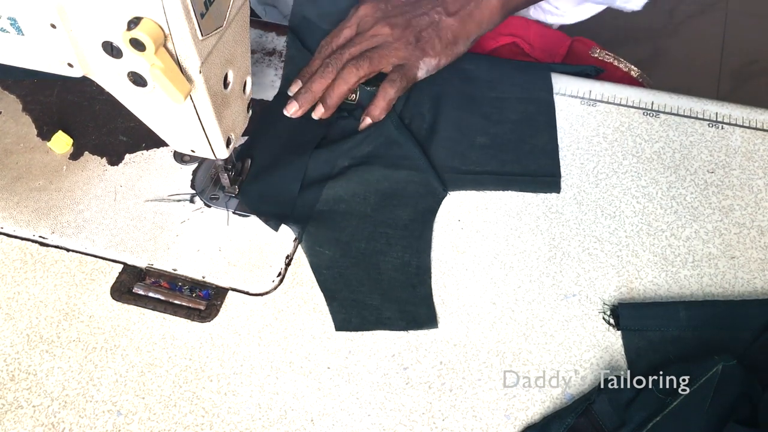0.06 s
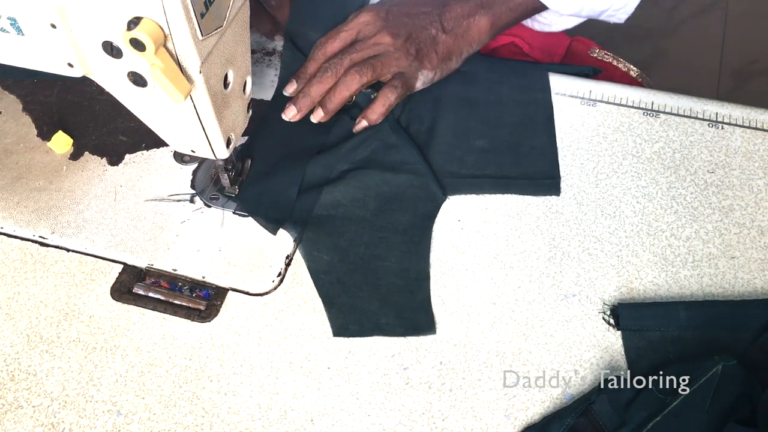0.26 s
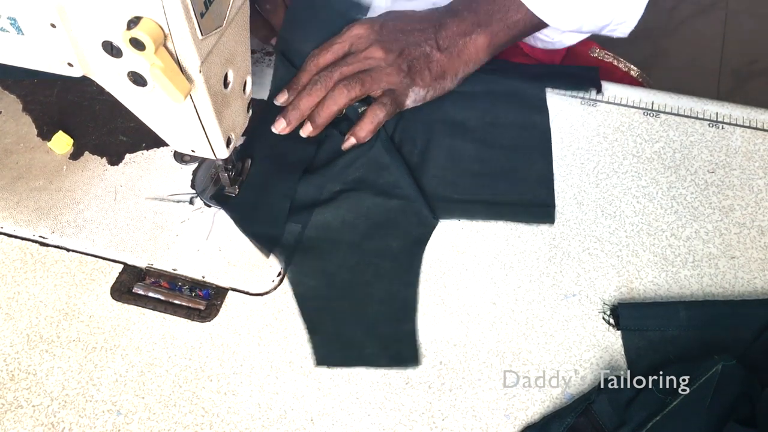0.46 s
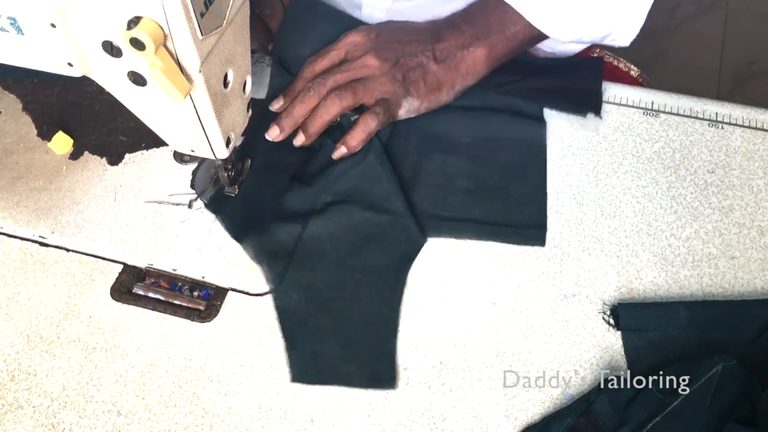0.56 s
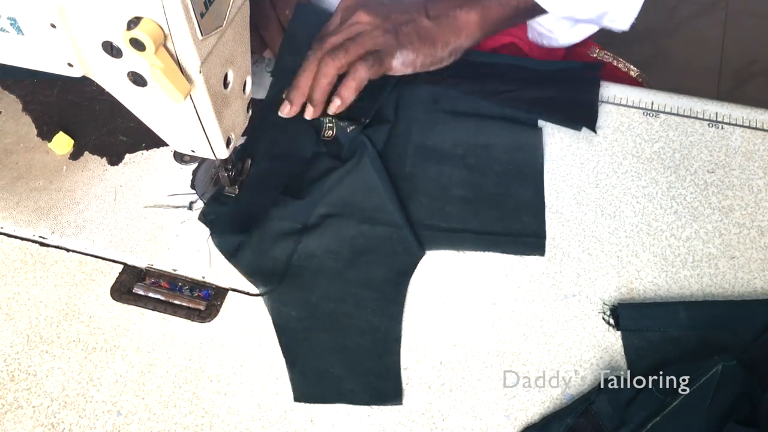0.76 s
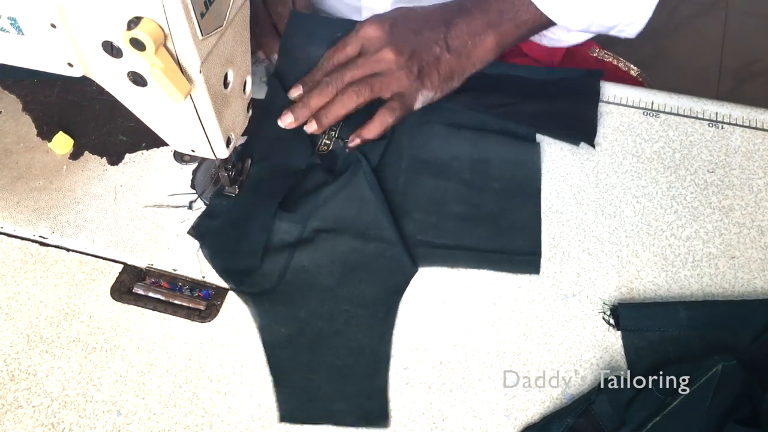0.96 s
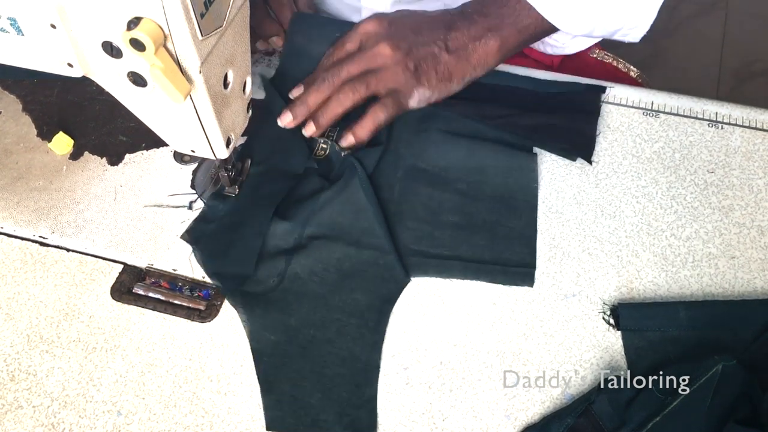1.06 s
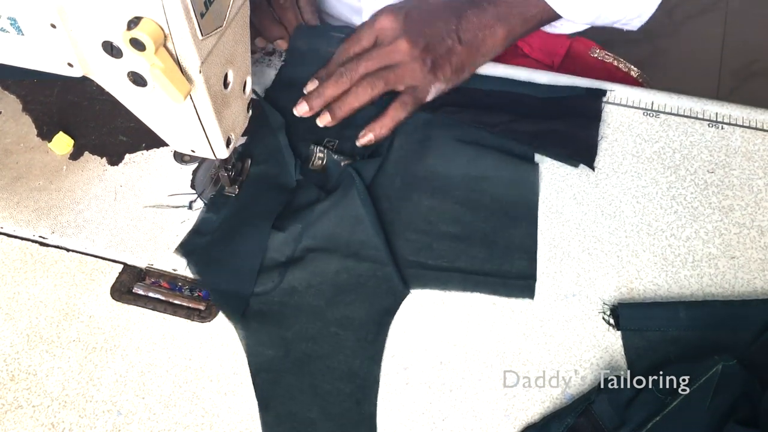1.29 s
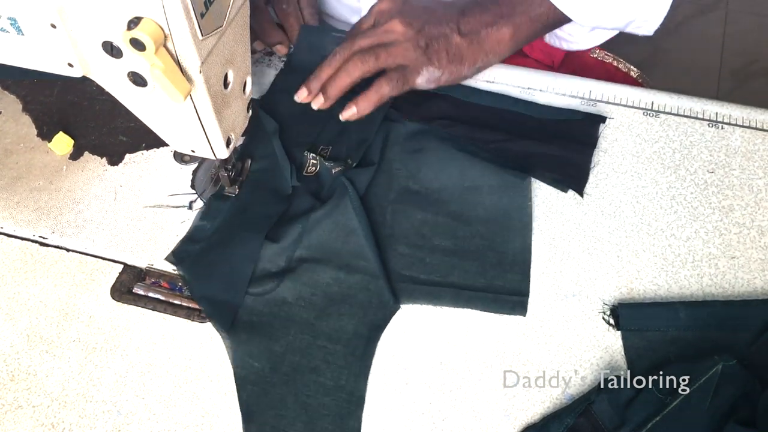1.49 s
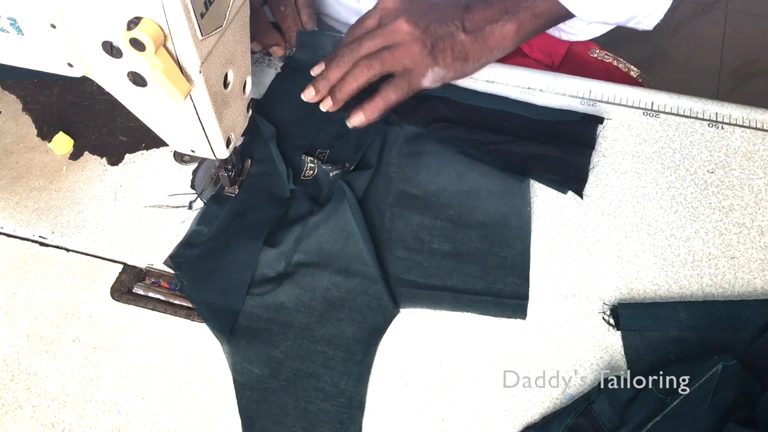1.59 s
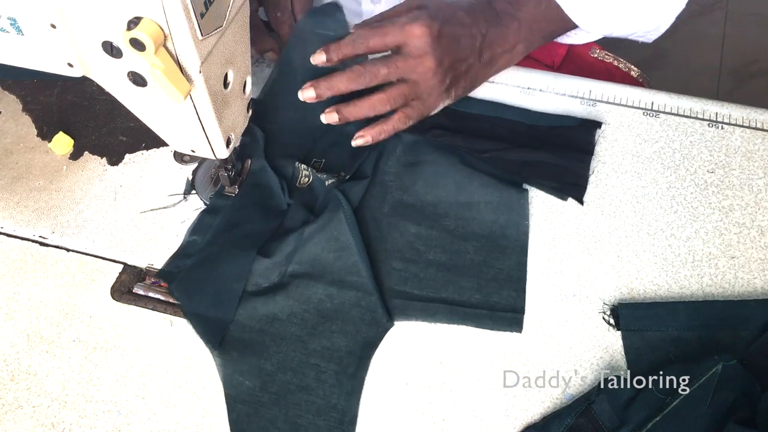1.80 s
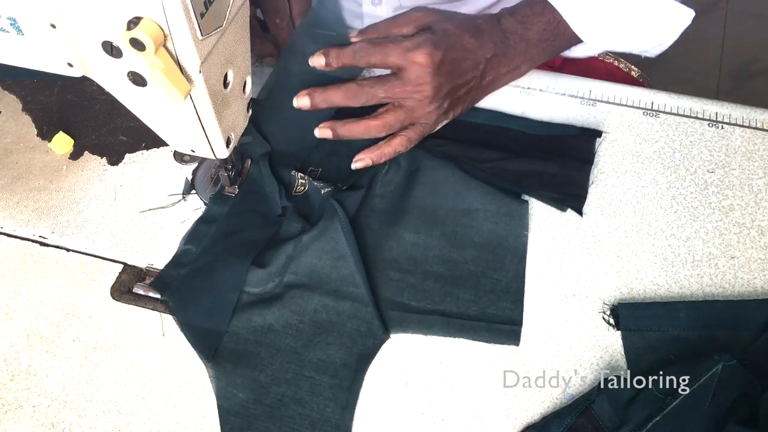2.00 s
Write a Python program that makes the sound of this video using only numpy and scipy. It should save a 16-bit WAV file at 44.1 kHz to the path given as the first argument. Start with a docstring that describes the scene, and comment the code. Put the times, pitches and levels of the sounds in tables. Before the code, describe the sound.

An industrial sewing machine fires one short, fast stitching burst, then light metallic ticks and cloth rustle

```python
"""An industrial lockstitch machine sews one short, fast run in a workshop, close to an overloading microphone.
The clutch scrapes in filtered noise, the shaft races and slows, and every stitch is four blows that set off
dying noise in table, stand and steel. Resonances drone at full speed; small squeaks and bumps are added.
Afterwards loose steel parts tick as noise with thin tones and the cloth slides as a crackle of tiny slips.
The motor is rumbling noise with two humming lines, and a short noise echo stands for the room."""
import sys
import numpy as np
from scipy import signal
from scipy.io import wavfile
from scipy.ndimage import uniform_filter1d

SR = 44100
rng = np.random.default_rng(int(sys.argv[2]) if len(sys.argv) > 2 else 0)


def store_pcm(level_fs):
    """Save levels as 16-bit WAV."""
    pcm = np.round(np.clip(level_fs, -1, 1) * 32767).astype(np.int16)
    wavfile.write(sys.argv[1], SR, np.atleast_2d(pcm).T)


N = 90404
TIME = np.arange(N) / SR  # s

# how fast the shaft turns, one stitch per turn: [t/s, speed/(stitches per s)]
SHAFT_SPEED = [(0.28, 38.09), (0.32, 42.92), (0.36, 62.34), (0.52, 76.56), (0.6, 72.17), (0.74, 65.91),
               (0.86, 46.82), (0.95, 50.32), (1.02, 42.96), (1.14, 43.17)]


def amp(db):
    """Turns decibels into a gain."""
    return 10 ** (np.asarray(db) / 20)


def unit(x):
    """Scales a sound to an average (rms) strength of 1."""
    return x / np.sqrt(np.mean(x ** 2) + 1e-20)


def level(curve):
    """Gain over time from [t/s, level/dB] rows, fading quickly outside them."""
    s, db = np.transpose(curve)
    outside = np.maximum(s[0] - TIME, 0) + np.maximum(TIME - s[-1], 0)
    return amp(np.interp(TIME, s, db)) * np.exp(-outside / 0.0027)


def steady(x):
    """Evens out the slow level while keeping single blows."""
    window = signal.windows.hann(3001)
    power = signal.fftconvolve(x ** 2, window / window.sum(), "same")
    floor = np.mean(x ** 2) / 20  # keeps silence from being blown up
    return x / np.sqrt(np.maximum(power, 0) + floor)


def colour(x, points):
    """Filters along a [f/Hz, level/dB] curve that falls steeply beyond its ends, with no sound ahead of time."""
    hz, db = np.transpose(points)
    f = np.log(abs(np.fft.fftfreq(4096, 1 / SR)) + 1)
    at = np.log(hz + 1)
    beyond = np.maximum(at[0] - f, 0) + np.maximum(f - at[-1], 0)
    gain_db = np.maximum(np.interp(f, at, db) - 40 * beyond, -100)
    log_gain = np.log(amp(gain_db))
    # minimum phase: the filter answers as early as it can
    taps = np.fft.ifft(np.exp(np.conj(signal.hilbert(log_gain)))).real
    return signal.fftconvolve(x, taps[:len(taps) // 2])[:len(x)]


def decay(t, t60):
    """Falls 60 dB in t60 seconds."""
    return np.exp(-np.log(1000) * t / t60)


def noise(points):
    """Steady noise with a given colour."""
    return unit(colour(rng.standard_normal(N), points))


def blow(start, rise, t60):
    """Envelope that swells for rise seconds and dies away."""
    t = TIME - start
    return np.clip(t / rise, 0, 1) ** 2 * decay(np.maximum(t - rise, 0), t60)


def ring(x, hz, width):
    """One resonance at hz; a smaller width (Hz) rings longer."""
    r = np.exp(-np.pi * width / SR)
    return signal.lfilter([1 - r], [1, -r * np.exp(2j * np.pi * hz / SR)], x).imag


def rattle(hits, t60):
    """Each hit breaks into a dying flurry of tiny contacts, made of noise."""
    power = signal.lfilter([1], [1, -decay(2 / SR, t60)], hits ** 2)
    return np.sqrt(power) * rng.standard_normal(N)


def smooth_noise(first, second):
    """Slow random wandering: noise averaged twice, over the given numbers of samples."""
    once = uniform_filter1d(rng.standard_normal(N), size=first)
    return unit(uniform_filter1d(once, size=second))


def add(mix, s, sound):
    """Mixes a sound in at time s."""
    part = mix[max(round(s * SR), 0):][:len(sound)]
    part += sound[:len(part)]


def motor():
    """Motor and belt rumble as noise that changes colour; two narrow resonances of noise give a wavering hum."""
    # strength of motor and belt: [t/s, level/dB]
    motor_level = [(0, -51.5), (.07, -45.5), (.19, -45.5), (.4, -28), (1.1, -31.5), (1.25, -41),
                   (1.38, -37), (1.54, -41.5), (1.62, -35.5), (1.75, -35), (1.81, -38), (1.9, -36.5),
                   (2.05, -40)]
    # rumble before the run: [f/Hz, level/dB]
    idle_colour = [(60, -61), (110, -26), (250, -23), (390, -6), (490, -14), (590, -16.5), (700, -21),
                   (1100, -18.5), (1330, -8.5), (1700, -22), (2400, -33), (3300, -39.5), (8000, -42),
                   (14000, -63)]
    # rumble that takes over as the run starts, and stays: [f/Hz, level/dB]
    run_colour = [(45, -46), (70, -20), (150, -11.5), (230, -11.5), (380, 2.5), (490, -5.5), (610, 4.5),
                  (740, -9), (880, -3), (1350, -9), (1850, -1.5), (2400, -24.5)]
    # hum lines: [f/Hz, level/dB against the motor level]
    hum_lines = [(392, -22), (618, -18.5)]
    running = np.clip((TIME - .2) / 0.43, 0, 1)
    rumble = np.sqrt(1 - running) * noise(idle_colour) + np.sqrt(running) * noise(run_colour)
    hum = np.zeros(N)
    for hz, db in hum_lines:
        once = ring(rng.standard_normal(N), hz, 23)
        hum += amp(db) * unit(ring(once, hz, 23))
    return level(motor_level) * (rumble + hum)


def squeaks():
    """Surfaces stick and slip in brief squeaks as the work is moved, part gliding tone and part scraping noise."""
    # squeaks and scrapes: [t/s, relative level/dB, f/Hz, length/s, glide/(Hz per s)]
    squeak_list = [(0.0, -45, 4000, 0.015, 0), (0.183, -31.5, 1930, 0.085, 2), (.924, -21, 1504, 0.019, 0),
                   (.985, -21, 1890, 0.014, 0), (1.349, -40, 1600, 0.083, 0),
                   (1.135, -24.5, 3550, 0.022, 0), (1.181, -22, 3470, 0.023, 0),
                   (1.228, -30, 3670, 0.026, 2), (1.411, -26, 3010, 0.019, 0), (1.468, -27, 3180, 0.013, 0),
                   (1.578, -30, 2775, 0.028, 0), (1.623, -28.5, 1960, 0.022, 0),
                   (1.689, -35, 4120, 0.017, 0), (1.723, -23.5, 3000, 0.023, 0),
                   (1.758, -24, 3950, 0.0175, 45000), (1.758, -30.5, 2050, 0.027, 0),
                   (1.863, -26, 4810, 0.0053, 15000), (1.962, -25, 3180, 0.015, 0),
                   (1.987, -26, 4200, 0.011, 0)]
    width_hz, roughness = 900, 0.46  # roughness: share of scrape against tone
    out, t = np.zeros(N), TIME[:SR // 16]
    for s, db, hz, length, glide in squeak_list:
        once = ring(rng.standard_normal(len(t)), hz, width_hz)
        scrape = unit(ring(once, hz, width_hz))
        pitch = hz + glide * (t - length / 2)
        tone = np.sqrt(2) * np.sin(2 * np.pi * np.cumsum(pitch) / SR)
        swell = np.sin(np.pi * np.minimum(t / length, 1))
        add(out, s, amp(db) * swell * ((1 - roughness) * tone + roughness * scrape))
    return out


def bumps():
    """Soft knocks in the table top: narrow bands of noise that swell and die away."""
    # bumps: [t/s, level/dB, f/Hz]
    bump_list = [(0.138, -37, 584), (1.035, -29, 633), (1.046, -28.5, 875), (1.082, -24.5, 950),
                 (1.264, -35.5, 650), (1.675, -31, 930), (1.698, -30.5, 925), (1.716, -34.5, 633),
                 (1.830, -26, 855), (1.854, -25, 900), (1.859, -31.5, 455), (1.908, -28.5, 630),
                 (2.019, -39, 127)]
    width = 1.19  # frequency ratio from the middle of the band to its edge
    rise_s, t60_s = 0.0047, 0.15
    out = np.zeros(N)
    for s, db, hz in bump_list:
        band = noise([(hz / width, -14), (hz, 0), (hz * width, -14)])
        out += amp(db) * blow(s, rise_s, t60_s) * band
    return out


def clutch():
    """The clutch scrapes and takes up the belt: coloured noise in swelling, dying grabs."""
    # grabs: [t/s, level/dB, rise/s, t60/s]
    grabs = [(.210, -12.5, 0.032, 0.29), (.304, -16.5, 0.015, 0.24)]
    # colour of the scrape: [f/Hz, level/dB]
    scrape_colour = [(200, -44), (300, -24), (400, -10), (490, -4.5), (590, 6.5), (660, 1.5), (750, 6.5),
                     (1020, -6.5), (1170, -0.5), (1600, -5.5), (1870, -3), (2400, -12.5), (3000, -11.5),
                     (4200, -22.5), (5200, -20), (7600, -36), (9300, -29), (15000, -50)]
    envelope = sum(amp(db) * blow(s, rise, t60) for s, db, rise, t60 in grabs)
    return noise(scrape_colour) * envelope


def stitches():
    """Blows of needle bar, hook, take-up and feed in every turn: one train for the table, one for the steel."""
    # blows in one stitch: [share of a turn, level in the table/dB, level in the steel/dB]
    strokes = [(.5, -3, 8.5), (.72, -6.5, 3.5), (.93, -1, -4), (0.17, -2, -14)]
    jitter_s, uneven_db = .0004, 1.5  # typical random spread of timing and level
    s, rate = np.transpose(SHAFT_SPEED)
    turns = np.cumsum(np.interp(TIME, s, rate, left=0, right=0)) / SR
    table, steel = np.zeros((2, N))
    for share, table_db, steel_db in strokes:
        # a blow falls where the shaft passes this share of its turn
        at = np.flatnonzero(np.diff(np.floor(turns - share)) > 0)
        shift, table_vary, steel_vary = rng.standard_normal((len(at), 3)).T
        at = at + (shift * jitter_s * SR).astype(int)
        table[at] += amp(table_db + uneven_db * table_vary)
        steel[at] += amp(steel_db + uneven_db * steel_vary)
    return table, steel


def surges():
    """Random swelling over a stitch or two, typically 2 dB up or down."""
    return amp(2 * smooth_noise(600, 400))


def table_knocks(knocks):
    """Blows rattle the table as coloured noise and ring its resonances, harder and softer by moments."""
    # force of the knocks: [t/s, relative level/dB]
    knock_level = [(.29, -53), (.324, -29), (.36, -17.5), (.402, -11.5), (.53, -8), (.63, -11), (.76, -12),
                   (.825, -15.5), (.87, -21.5), (.92, -27), (.96, -53), (1.0, -28), (1.115, -35.5),
                   (1.15, -50), (1.2, -51)]
    # colour of the rattling table: [f/Hz, level/dB]
    wood_colour = [(150, -34.5), (250, -29.5), (317, -11.5), (504, -3.5), (572, 1.5), (726, -4.5),
                   (1310, -10), (1460, -4), (1740, -11.5), (1900, -4), (2360, -25.5), (4040, -26),
                   (5000, -46), (6500, -60), (11000, -120)]
    # resonances of the table: [f/Hz, width/Hz, relative level/dB]
    table_modes = [(572.6, 10, -4.5), (675.5, 12, -9.5), (454, 16, -11), (825, 55, -7), (1430, 98, -15.5),
                   (1912, 17, -5)]
    wood = steady(colour(rattle(knocks, 0.088), wood_colour))
    drive = rattle(knocks, 0.01)
    modes = steady(sum(amp(db) * unit(ring(drive, hz, width)) for hz, width, db in table_modes))
    return level(knock_level) * (amp(-1) * wood + amp(-10.5) * modes * surges()) * surges()


def stand_shake(knocks):
    """The stand shakes: low noise set off by the blows, over a steady throb of pure tones."""
    # shaking of the stand: [t/s, relative level/dB]
    shake_level = [(.32, -62), (.355, -45), (.40, -25.5), (.5, -20), (.62, -19), (.75, -21), (.82, -26),
                   (.86, -34), (.895, -25.5), (.935, -47), (1.1, -46.5)]
    # colour of the shaking: [f/Hz, level/dB]
    stand_colour = [(40, -36), (55, -51), (90, -24), (135, -9), (180, 1.5), (225, 0.5), (255, -13.5),
                    (305, 1.5), (420, -2.5)]
    # steady throb: [f/Hz, level/dB against the shaking level]
    throb_tones = [(70, -10), (109, -13)]
    throb = sum(amp(db) * np.sin(2 * np.pi * (hz * TIME + rng.random())) for hz, db in throb_tones)
    shaking = steady(colour(rattle(knocks, 0.096), stand_colour))
    return level(shake_level) * (np.sqrt(2) * throb + amp(1.5) * shaking)


def steel_clatter(clicks):
    """Blows clatter in the steel over the even whirr of the hook, with a shorter, sharper needle-bar click."""
    # force of the clatter: [t/s, relative level/dB]
    clatter_level = [(0.22, -40), (0.228, -35.5), (0.266, -34), (0.372, -18.5), (0.508, -16.5),
                     (0.544, -18.5), (0.59, -15.5), (1.04, -26), (1.188, -32), (1.22, -62)]
    # colour of the steel works: [f/Hz, level/dB]
    steel_colour = [(1290, -13), (2200, -1.5), (2450, -6.5), (2810, 1.5), (2950, -2.5), (4030, -7.5),
                    (4820, 0), (5680, -5), (7080, -4.5), (8270, -1.5), (9580, -5), (10500, -7),
                    (11300, -12.5), (12200, -9.5), (13800, -16), (15500, -23.5)]
    # colour of the needle-bar click: [f/Hz, level/dB]
    needle_colour = [(3000, -16), (6500, -11.5), (8100, 4), (9500, -12), (10400, 2.5), (12500, -16.5),
                     (15800, -22)]
    whirr = rng.standard_normal(N)
    contacts = steady(rattle(clicks, 0.05)) + whirr
    steel = amp(0.5) * steady(colour(contacts, steel_colour))
    # squaring makes the strong blows stand out
    needle = amp(-4) * steady(colour(rattle(clicks ** 2, 0.021), needle_colour))
    return level(clatter_level) * (steel + needle)


def machine():
    """The same stitches drive the table, the stand and the steel works."""
    knocks, clicks = stitches()
    return table_knocks(knocks) + stand_shake(knocks) + steel_clatter(clicks)


def drone():
    """Fast shaking keeps some table resonances sounding: tones that waver in strength and phase."""
    # resonances that build up: [f/Hz, relative level/dB]
    drone_tones = [(585, -16), (678, -25), (807, -30), (1463, -27.5), (1879, -28), (1908, -34)]
    start_rate, rate_range = 52.7, 22  # stitches per s: where it starts, and how much more for full strength
    waver = 0.25  # depth, as a share of the strength and in radians of phase
    s, rate = np.transpose(SHAFT_SPEED)
    smooth_rate = uniform_filter1d(np.interp(TIME, s, rate), size=3000)
    push = np.clip((smooth_rate - start_rate) / rate_range, 0, 1)
    out = np.zeros(N)
    for hz, db in drone_tones:
        strength = 1 + waver * smooth_noise(1500, 1500)
        phase = 2 * np.pi * (hz * TIME + rng.random()) + waver * smooth_noise(1500, 1500)
        out += amp(db) * np.sqrt(2) * strength * np.sin(phase)
    return push * out


def cloth():
    """Fibres catch and slip as the cloth slides: random tiny rattles whose colour shifts with the folds."""
    # sliding of the cloth: [t/s, relative level/dB]
    slide_level = [(0.9, -33), (1.036, -26), (1.082, -32.5), (1.218, -29), (1.366, -38.5), (1.372, -27),
                   (1.408, -36.5), (1.426, -24), (1.538, -36.5), (1.734, -30.5), (1.74, -43), (1.768, -33),
                   (1.8, -41.5), (1.852, -36), (1.858, -30), (1.9, -40), (1.992, -36.5), (2.05, -37)]
    # colour of the sliding: [f/Hz, level/dB]
    fibre_colour = [(1200, -9.5), (1900, -9), (2350, -12.5), (2950, 4.5), (3600, 0), (4500, 1.5),
                    (5500, -5), (6500, -8), (7400, -29), (10000, -9), (15000, -33)]
    slips_per_s, patch_db = 900, 4  # patch_db: typical random shift of the colour
    strength_db = np.minimum(rng.exponential(1, N), 4)
    slips = (rng.random(N) < slips_per_s / SR) * amp(strength_db)
    spectrum = signal.stft(colour(rattle(slips, 0.012), fibre_colour))[2]
    # random patches, smoothed over pitch and then over time
    folds = uniform_filter1d(rng.standard_normal(spectrum.shape), size=3, axis=0)
    folds = unit(uniform_filter1d(folds, size=5, axis=1))
    sliding = signal.istft(spectrum * amp(patch_db * folds))[1][:N]
    return amp(0.5) * level(slide_level) * steady(sliding)


def ticks():
    """Small steel parts touch, each time at another spot: a short chatter of noise and a thin ring of tones."""
    # light ticks of loose steel: [t/s, relative level/dB]
    tick_list = [(1.1634, -18.5), (1.18, -17), (1.2034, -27), (1.2318, -17), (1.271, -15), (1.289, -17),
                 (1.3232, -22), (1.3425, -19), (1.3722, -21.5), (1.3953, -24), (1.42, -16), (1.4363, -14.5),
                 (1.4534, -13), (1.4825, -12), (1.5085, -17), (1.561, -12.5), (1.58, -18), (1.5942, -13.5),
                 (1.6172, -19), (1.6264, -13.5), (1.6564, -29), (1.6726, -16), (1.6912, -20.5),
                 (1.712, -28), (1.73, -18), (1.7504, -44), (1.7873, -20.5), (1.8083, -42), (1.845, -15.5),
                 (1.8562, -16), (1.864, -17), (1.8766, -15.5), (1.8836, -20), (1.9042, -16.5), (1.919, -16),
                 (1.9367, -16.5), (1.9668, -14.5), (1.9864, -32), (1.9947, -24), (2.026, -27)]
    # colour of the chatter: [f/Hz, level/dB before the random change]
    chatter_colour = [(1500, -33), (3000, 5.5), (4800, -15), (6300, 2.5), (7200, -7.5), (8400, 7),
                      (9000, -8), (9600, 1.5), (10600, -0.5), (11600, -9), (12500, -14), (13200, -10),
                      (14100, -9), (15800, -13)]
    # ringing tones: [f/Hz, relative level/dB before the random change, t60/s]
    tick_modes = [(4690, -10, 0.028), (6840, -33, 0.046), (7730, -20, 0.04), (8600, -10.5, 0.036),
                  (8560, -2, 0.035), (9630, 1, 0.02), (10700, -12, .03), (12500, -20, .03),
                  (14100, -17, 0.022)]
    vary_db, rise_s = 5, 0.0011  # vary_db: typical random change from tick to tick
    out, t = np.zeros(N), TIME[:SR // 8]
    fading = decay(t, 0.022) + amp(-10.5) * decay(t, 0.27)  # quick fall, then a weaker tail
    for s, db in tick_list:
        spot = [(hz, at_db + vary_db * rng.standard_normal()) for hz, at_db in chatter_colour]
        tone = np.zeros(len(t))
        for hz, mode_db, t60 in tick_modes:
            strength = amp(mode_db + vary_db * rng.standard_normal())
            tone += strength * decay(t, t60) * np.sin(2 * np.pi * (hz * t + rng.random()))
        chatter = fading * unit(colour(rng.standard_normal(len(t)), spot))
        add(out, s, amp(db) * np.minimum(t / rise_s, 1) * (tone + chatter))
    return amp(-10) * out


def room(x):
    """Short, blurred reflections of the workshop: an echo of dying noise that starts after 4 ms."""
    t = TIME[:SR // 2]
    tail = rng.standard_normal(len(t)) * decay(t, 0.097) * (t > .004)
    return signal.fftconvolve(x, tail / np.linalg.norm(tail))[:N]


def scene():
    """Adds up all sources; the room answers all but the drone."""
    sources = motor() + squeaks() + bumps() + clutch() + machine() + cloth() + ticks()
    return (sources + drone() + amp(-10) * room(sources))[None]


def record(dry):
    """The loudest peaks overload and are rounded off; then the highest treble is cut."""
    ceiling, hardness = 1.0, 15  # a higher hardness bends the peaks more abruptly
    clipped = dry / (1 + abs(dry / ceiling) ** hardness) ** (1 / hardness)
    treble_cut = signal.firwin(511, 15800, window=("kaiser", 9), fs=SR)  # edge at 15800 Hz
    return signal.oaconvolve(clipped, treble_cut[None], "same")


dry = scene()
out = record(dry)
store_pcm(out)
```